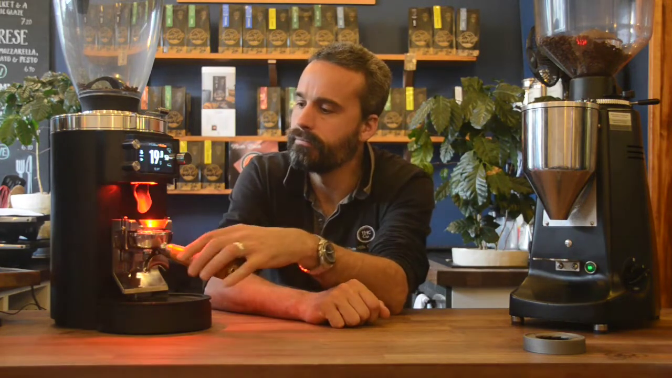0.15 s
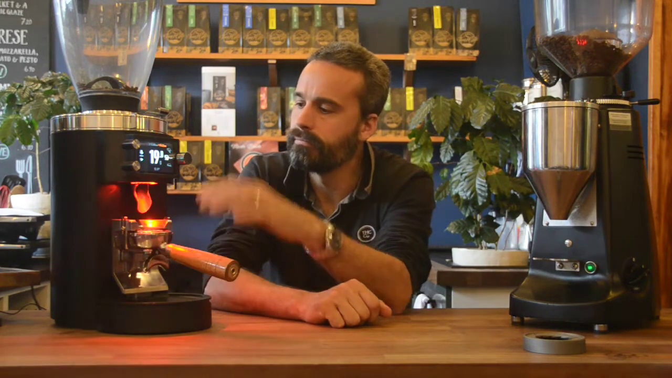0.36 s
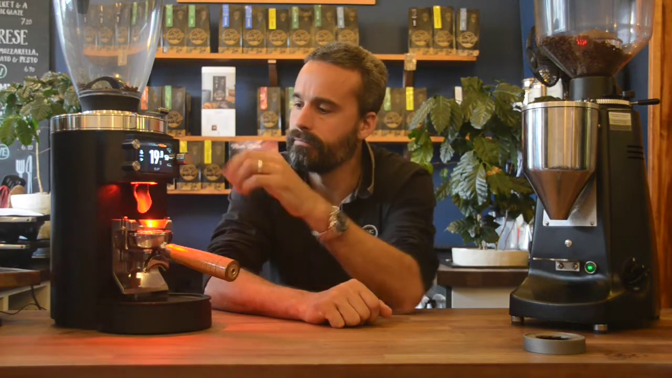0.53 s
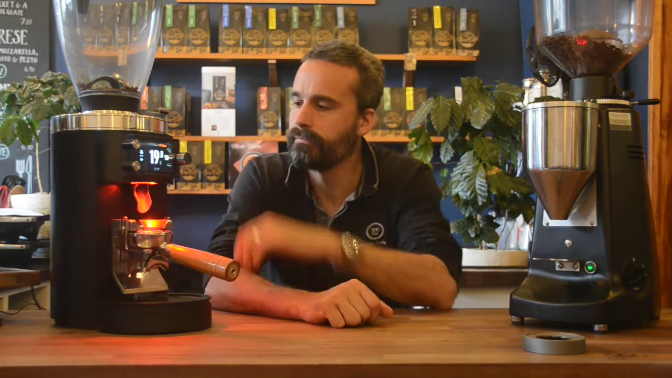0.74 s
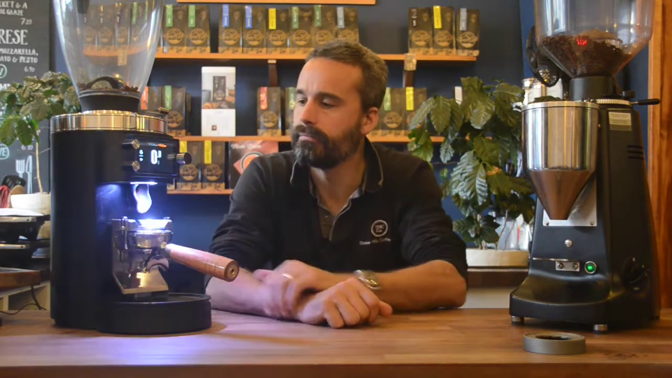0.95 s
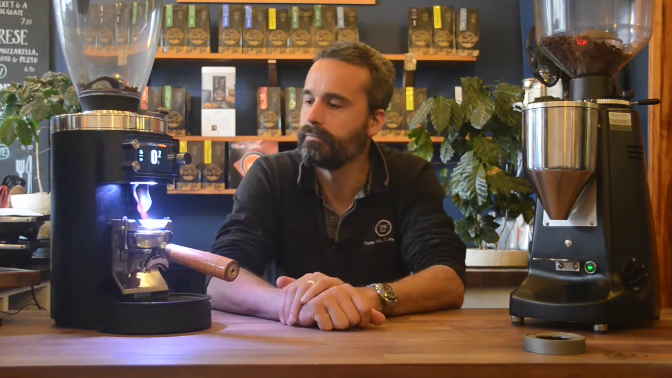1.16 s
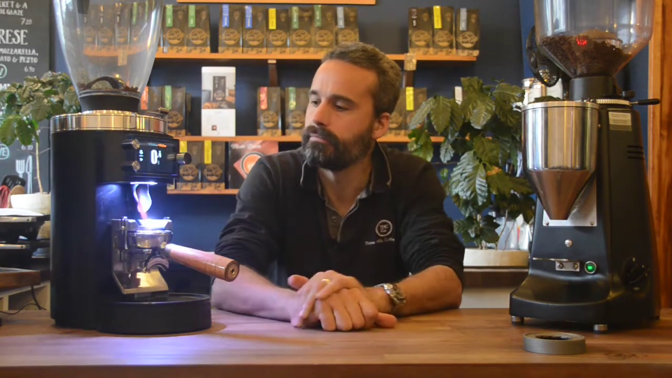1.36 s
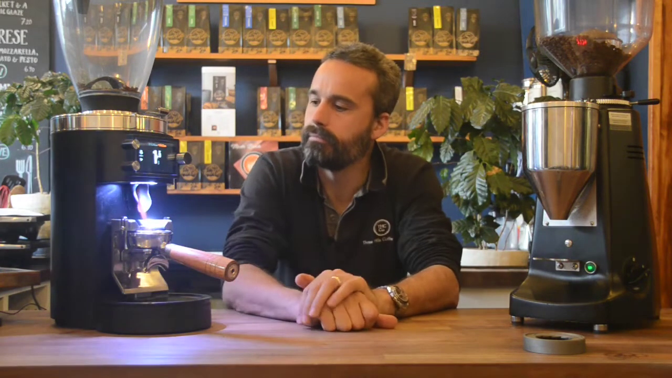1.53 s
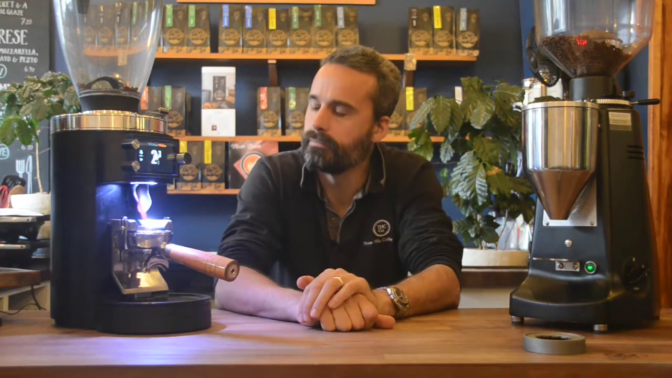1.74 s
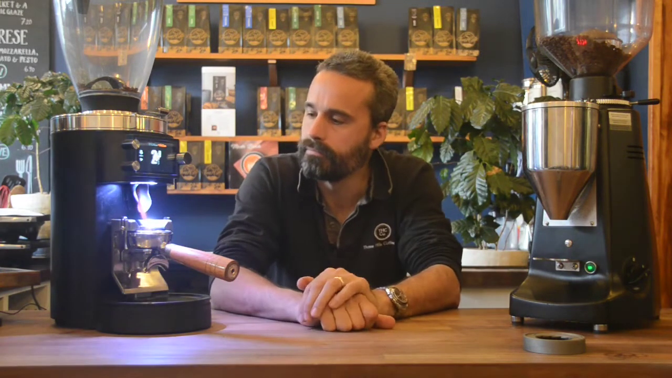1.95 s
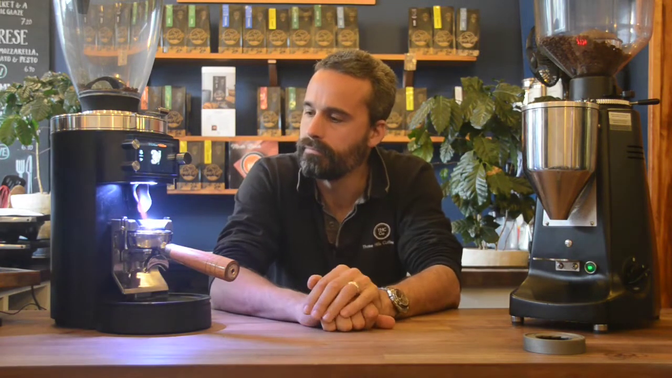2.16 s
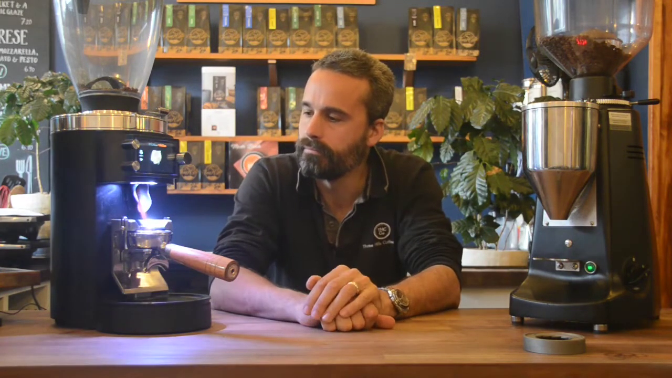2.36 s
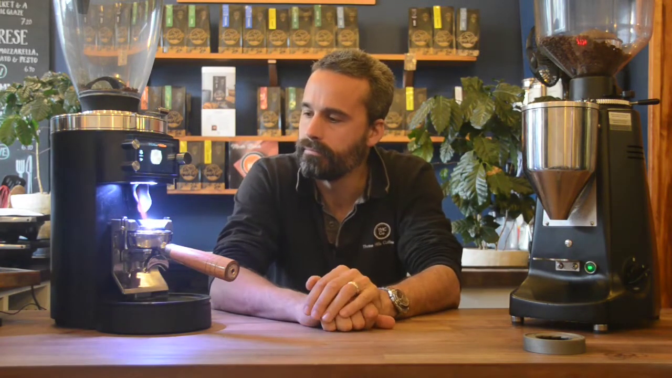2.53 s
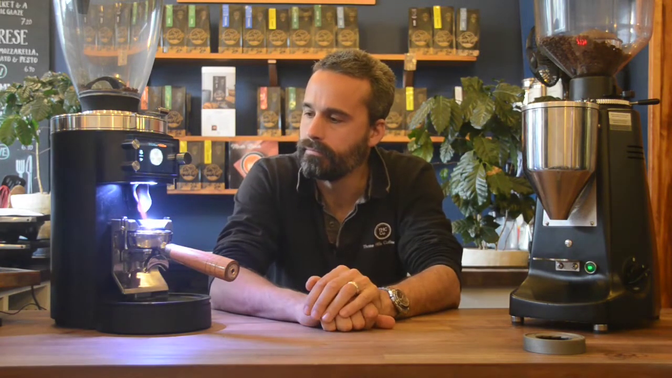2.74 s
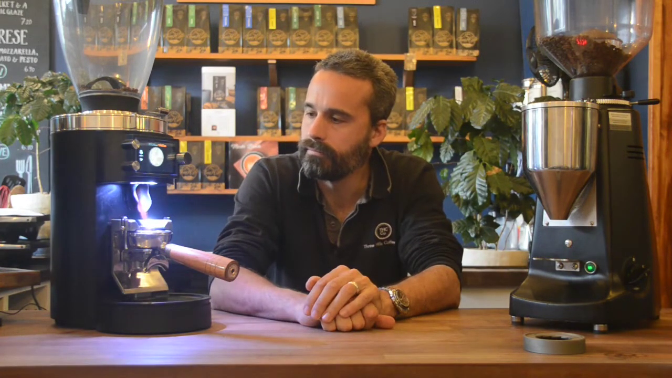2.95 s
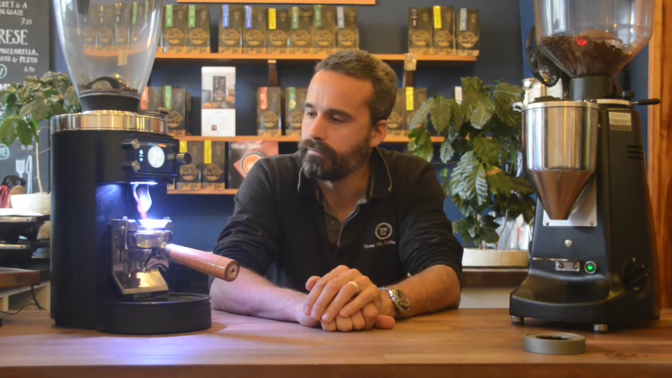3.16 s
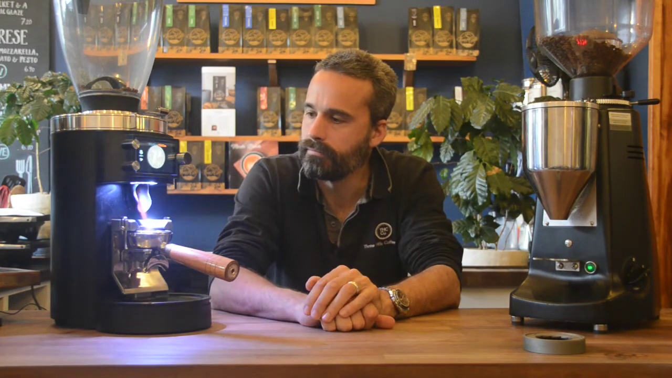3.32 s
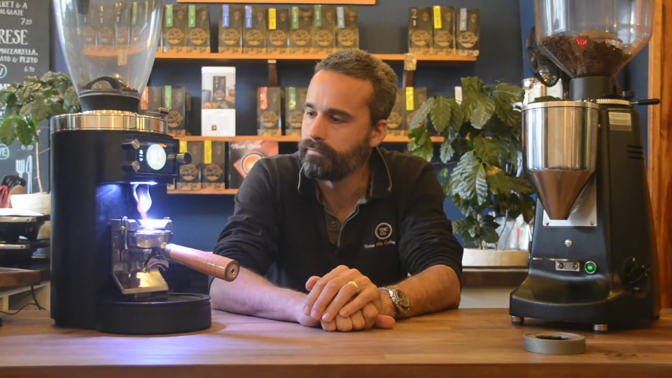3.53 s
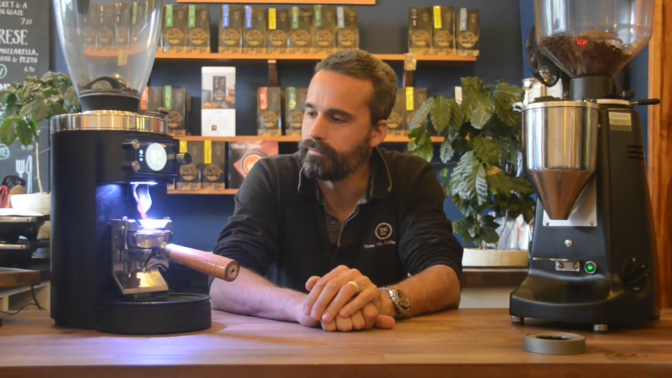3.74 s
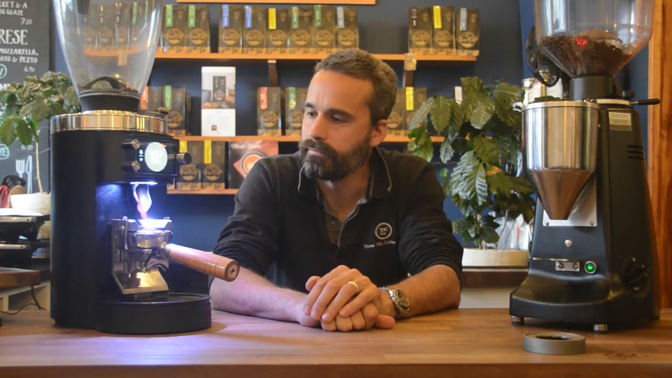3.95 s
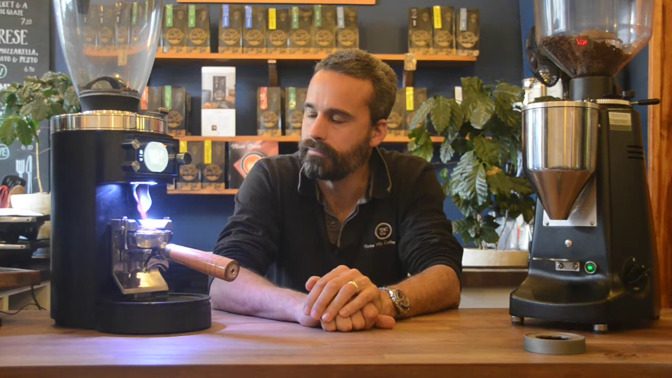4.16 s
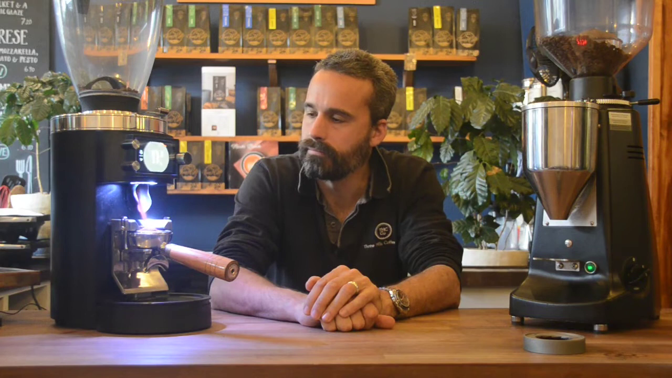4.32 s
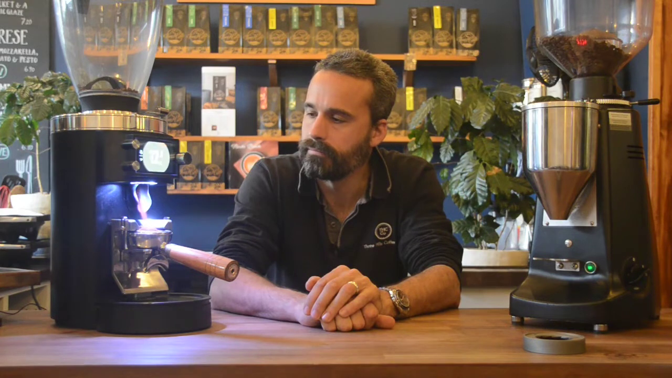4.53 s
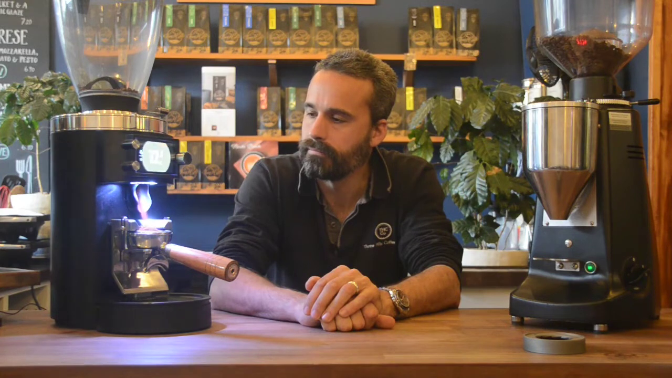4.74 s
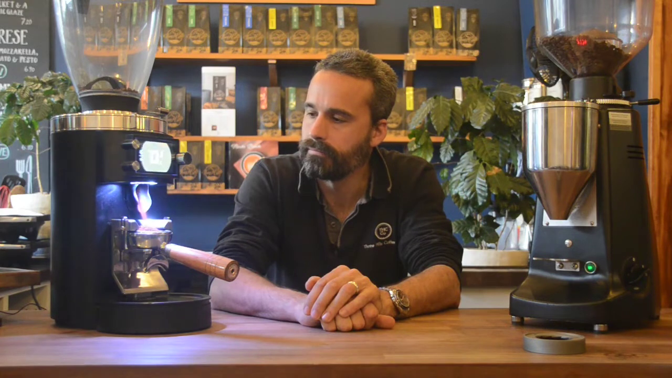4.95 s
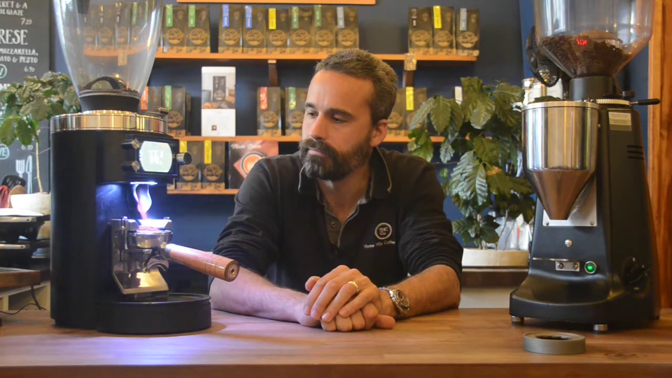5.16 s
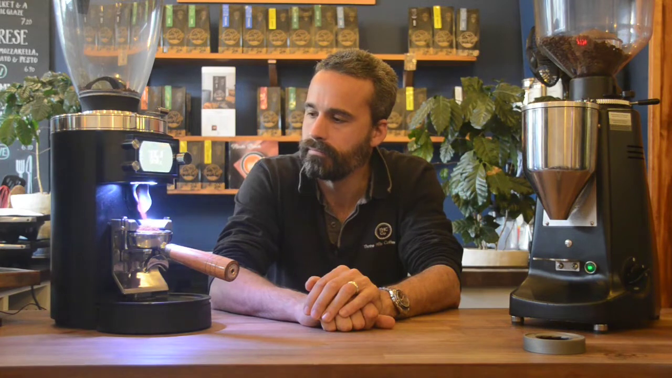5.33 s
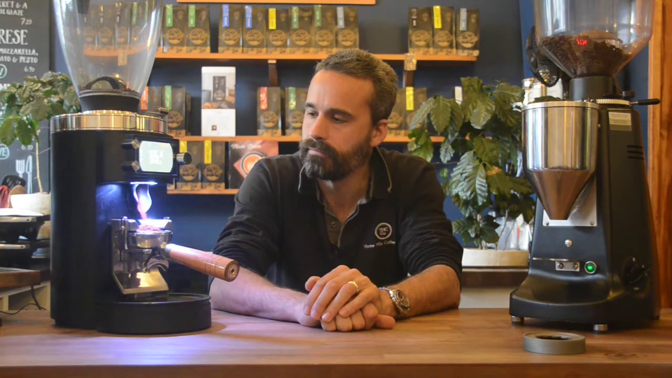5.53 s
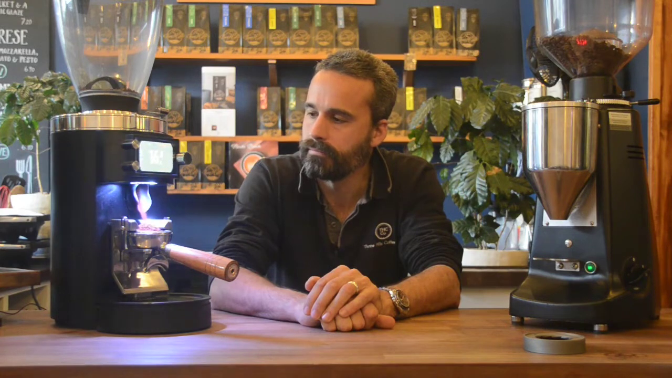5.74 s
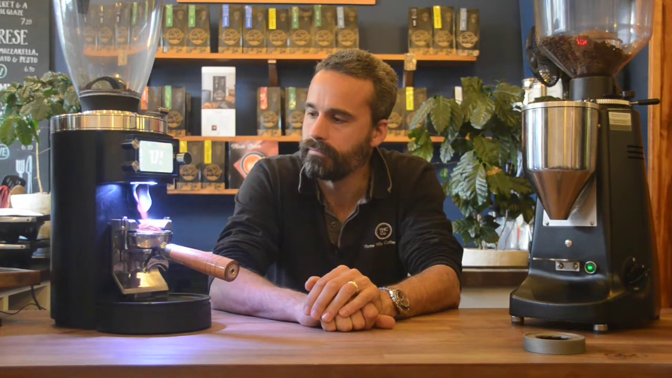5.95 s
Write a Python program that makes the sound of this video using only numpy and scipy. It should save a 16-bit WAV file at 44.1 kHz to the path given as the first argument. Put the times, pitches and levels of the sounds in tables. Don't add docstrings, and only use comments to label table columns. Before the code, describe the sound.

From 0 to 0.4 s a quiet shop is heard: low airy ventilation and distant refrigerator hum, with a compressor and pipe tone swelling unevenly. At about 0.43 s a small switch ticks, followed until 0.83 s by a soft, hissy sleeve rub that swells twice, slightly hollow from the counter's reflection. At 0.84 s the motor starts with a hard knock, and a brief falling low thump follows at 0.9 s. Grinding comes in almost at once: a dense, loud, gritty roar of fracturing beans, metallic in the low mids, rattling and bright above, over a faint steady electrical hum. The brightest edge shifts slightly between 1 and 1.6 s. Whole beans snap sharply at 0.9, 1.0 and 1.5 s, more softly at 1.8, 3.0, 3.4, 3.9 and 5.4 s. The pitch stays constant, the level flutters, and grinding continues through the end at about 6 s. Close small microphone, short room reverberation.

```python
import sys
import numpy as np
from scipy import signal
from scipy.fft import rfft, irfft, next_fast_len
from scipy.io import wavfile
from scipy.ndimage import map_coordinates

SR = 44100
rng = np.random.default_rng(int(sys.argv[2]) if len(sys.argv) > 2 else 0)


def wav_out(sig):
    wavfile.write(sys.argv[1], SR, np.round(np.clip(np.atleast_2d(sig).T, -1, 1) * 32767).astype(np.int16))


def boost_factor(decibels):
    exponent = np.asarray(decibels, float) / 20
    return 10 ** exponent


N = 268569
T = np.arange(N) / SR


def unit(x):
    return x / np.sqrt(np.mean(x ** 2) + 1e-20)


def along(points, hz):
    f, v = np.transpose(points)
    return np.interp(np.log(hz + 1), np.log(f + 1), v)


def curves(rows):
    s, *columns = np.transpose(rows)
    return [np.interp(T, s, column) for column in columns]


def wobble(rate):
    knots = rng.standard_normal(int(N * rate / SR) + 4)
    return map_coordinates(knots, [T * rate])


def coloured(x, gain):
    m = 2 * next_fast_len(N // 2 + SR // 4)
    cepstrum = irfft(np.log(gain(np.fft.rfftfreq(m, 1 / SR)) + 1e-5), m)
    cepstrum[1:m // 2] *= 2
    cepstrum[m // 2 + 1:] = 0
    return irfft(rfft(x, m) * np.exp(rfft(cepstrum)), m)[..., :N]


def noise(spectrum):
    return unit(coloured(rng.standard_normal(N), lambda f: boost_factor(along(spectrum, f))))


def modes(rows, skirt):
    def peak(f, centre, width):
        return (f * width) ** 2 / ((centre * centre - f * f) ** 2 + (f * width) ** 2)

    def gain(f):
        return np.sqrt(sum(boost_factor(db) ** 2 * peak(f, hz, width) ** skirt for hz, width, db in rows))
    return gain


def tones(rows, sway_db, drift):
    total = 0
    for hz, db in rows:
        level = boost_factor(db + sway_db * wobble(6)) * np.sqrt(2)
        total = total + level * np.sin(2 * np.pi * hz * T + drift * wobble(5.5))
    return total


def blows(rows):
    x = np.zeros(N)
    for s, db in rows:
        x[round(s * SR)] = boost_factor(db)
    return x


def shop():
    # time_s, drone_db, compressor_db, pipe_db
    swells = [(0.0, -47, -58, -58), (0.162, -45.5, -57.5, -58), (0.328, -46, -51, -53),
              (0.524, -50, -49, -39), (0.55, -43, -52, -61), (0.59, -51, -53, -59), (0.63, -40, -58, -55),
              (0.656, -53, -52, -39), (0.68, -38, -57, -47.5), (0.724, -49, -53, -63),
              (0.784, -50, -49, -66), (0.82, -51, -52, -37)]
    # frequency_hz, level_db (per Hz)
    air_spectrum = [(12, -69), (20, -23), (171, -18), (219, -10), (238, -14), (306, -14), (362, -10),
                    (520, -19), (1380, -31), (1630, -34), (1980, -38), (2150, -35), (2340, -39.5),
                    (15500, -66)]
    # frequency_hz, width_hz, level_db
    shell = [(422.7, 11.3, 2.5), (588, 32, -6), (647, 21, -9), (720, 31, -6.5), (792, 18, -4.5)]
    # pitch_hz, level_db (rms)
    fridge = [(213.8, -48.5), (257, -47), (300, -53), (1593, -66), (2126, -68)]
    drone_db, compressor_db, pipe_db = curves(swells)
    air = boost_factor(drone_db + 2) * noise(air_spectrum)
    shell_noise = unit(coloured(rng.standard_normal(N), modes(shell, skirt=0.99)))
    pump = boost_factor(compressor_db + 8.5) * shell_noise
    pipe = boost_factor(pipe_db) * tones([(496, -0.79)], sway_db=1.0, drift=1.4)
    return air + pump + pipe + tones(fridge, sway_db=2.5, drift=0.45)


def hand():
    # time_s, peak_db
    contact = [
        (0.4324, -32),
    ]
    # time_s, level_db
    sleeve = [
        (0.45, -77),
        (0.488, -60),
        (0.514, -52),
        (0.586, -48),
        (0.616, -56),
        (0.678, -51),
        (0.756, -55),
        (0.836, -64),
    ]
    # time_s, delay_ms
    bounce = [
        (.45, 0.52),
        (.6, 0.76),
        (.61, 0.52),
        (.86, 0.766),
    ]
    # frequency_hz, level_db (per Hz)
    cloth = [(1760, -31), (3000, -7), (3420, -11), (5610, -11), (6530, -6), (13000, -4), (15500, -11)]
    tick = boost_factor(15) * coloured(blows(contact), modes([(2300, 780, 0), (4300, 890, -2)], skirt=1.5))
    rub = noise(cloth)
    delay_ms = curves(bounce)[0]
    echo = map_coordinates(rub, [np.arange(N) - delay_ms * SR / 1000])
    moving = (T > sleeve[0][0]) & (T < sleeve[-1][0])
    return tick + moving * boost_factor(curves(sleeve)[0]) * unit(rub + 0.42 * echo)


def kick():
    # time_s, peak_db
    jerks = [
        (.8405, -23),
        (.8455, -6),
        (.851, -16),
    ]
    # frequency_hz, width_hz, level_db
    frame = [(253, 40, -4), (355, 40, 1), (517, 45, 4), (696, 45, -4), (900, 45, -1), (1300, 70, -11),
             (3600, 1800, -39)]
    # start_s, from_hz, to_hz, level_db
    lurch = (.895, 109, 51, -30)
    start_s, from_hz, to_hz, level_db = lurch
    progress = np.clip((T - start_s) / 0.049, 0, 1)
    phase = 2 * np.pi * np.cumsum(from_hz + (to_hz - from_hz) * progress) / SR
    thump = boost_factor(level_db) * np.sin(np.pi * progress) * np.sin(phase)
    return boost_factor(34) * coloured(blows(jerks), modes(frame, skirt=1.2)) + thump


def hail(per_s, spread_db, grit):
    draw = rng.random((20000, 3))
    gaps_s = -np.log(draw[:, 0] + 1e-9) / per_s
    when = np.cumsum(gaps_s * SR).astype(int)
    size = boost_factor(-spread_db * np.log(draw[:, 1] + 0.0016)) * np.sign(draw[:, 2] - .5)
    fractures = np.bincount(when, size, N)[:N]
    return unit(unit(fractures) + grit * rng.standard_normal(N))


def grinder():
    # time_s, casing_db, hopper_db, chute_db, dust_db
    grind = [(0.86, -17, -29, -29, -43), (0.89, -18, -15.5, -25, -39), (0.92, -24.5, -22.5, -26.5, -38),
             (0.96, -11, -19, -25.5, -46), (1.0, -19.5, -18.5, -25, -38), (1.03, -12.5, -17, -25, -42),
             (1.06, -19, -24, -27, -41), (1.09, -26, -16.5, -25.5, -41), (1.12, -17.5, -18.5, -25, -44),
             (1.22, -17.5, -19, -26.5, -40), (1.3, -15, -19.5, -27.5, -40.5), (1.49, -20, -21.5, -25, -40),
             (1.63, -12, -21, -25, -40), (1.66, -17, -20, -26.5, -39.5), (2.15, -16, -20.5, -26.5, -40),
             (2.17, -20, -21.5, -24.5, -40), (2.2, -11, -16.5, -28, -40), (2.23, -21.5, -19.5, -26.5, -41),
             (2.3, -15.5, -19, -25.5, -39), (2.53, -16, -21, -25.5, -40), (2.58, -21, -20, -26.5, -40),
             (2.65, -12.5, -18, -26, -40), (2.74, -21.5, -19, -24.5, -41), (2.77, -14.5, -19.5, -26, -39),
             (2.81, -24.5, -21, -26.5, -40), (2.86, -10.5, -20, -26, -39), (2.87, -18, -22.5, -25.5, -39),
             (2.93, -14, -15.5, -27.5, -40), (2.94, -15.5, -19.5, -26, -42), (3.63, -17.5, -19.5, -26, -39),
             (3.85, -13.5, -18.5, -25, -39.5), (3.86, -16.5, -20, -25, -38), (4.02, -14, -17, -27, -41),
             (4.06, -18, -20.5, -27.5, -41), (4.27, -18.5, -20, -27, -41), (4.28, -14.5, -21.5, -27.5, -41),
             (4.47, -20.5, -18.5, -26.5, -39.5), (4.5, -12.5, -19, -26, -40), (4.69, -19, -19.5, -27, -40),
             (4.78, -15.5, -17.5, -25, -41), (4.79, -22.5, -21.5, -26.5, -39),
             (4.84, -15.5, -18, -25.5, -40), (5.03, -18, -20.5, -27.5, -40), (5.04, -19.5, -17, -26, -39),
             (5.08, -22.5, -17.5, -27, -41), (5.17, -14, -20.5, -25.5, -39), (5.22, -17.5, -18, -26, -40.5),
             (5.9, -16, -18.5, -26.5, -40), (5.94, -20.5, -24.5, -28, -40), (6.0, -14, -15.5, -27, -42),
             (6.09, -16, -20.5, -26, -40)]
    # frequency_hz, width_hz, level_db
    casing = [(254.7, 32.6, -12), (291, 32, -22.5), (541.7, 28.3, 1.5), (573, 48, -8), (674, 45, -11)]
    # frequency_hz, width_hz, level_db
    hopper = [(999, 49, -14), (1101.5, 74, -8), (1152, 26, -6.5), (1206, 56.6, -4.5), (1389, 29, -9.5),
              (1576, 99, -3), (1642, 53, -3), (1681, 39.5, -0.5)]
    # frequency_hz, width_hz, level_db
    chute = [(2120, 65, -10.5), (2486, 267, 3), (2860, 250, -2.5), (3130, 300, -3), (3987, 370, -8),
             (4414, 150, -7.5), (5170, 360, -13), (6230, 257, 0), (6440, 195, 1)]
    # frequency_hz, width_hz, level_db
    dust_lined = [(7990, 456, 6), (8970, 290, 2), (9600, 420, -1.5), (10600, 700, -8), (11870, 410, -3),
                  (12900, 450, -7.5), (13600, 470, -7.5), (15400, 400, -31)]
    # frequency_hz, width_hz, level_db
    dust_empty = [(7300, 400, 2), (7900, 360, 3.5), (9300, 410, -2.5), (9800, 440, -4), (11000, 700, -8),
                  (12500, 550, -7), (13600, 770, -10), (15400, 400, -20)]
    # from_s, to_s
    filling = (1.04, 1.6)
    # frequency_hz, level_db (per Hz)
    rumble = [(20, -36), (35, 7), (45, 1), (70, -8.5), (150, 11), (220, 6), (400, -13.5), (900, -6),
              (1400, 11.5), (2500, -32)]
    # pitch_hz, level_db (rms)
    hum = [(91.7, -58), (100, -40.5), (183.4, -50.5), (200, -59), (300, -42), (1200, -52)]
    start_s = .85
    running = np.clip((T - start_s) / 0.017, 0, 1)
    spun_up = np.clip((T - start_s) / 0.09, 0, 1)
    feed = boost_factor(0.54 * wobble(25) + 0.71 * wobble(90))
    beans = feed * hail(per_s=1500, spread_db=2.5, grit=1.27)

    def ring(rows, skirt):
        return unit(coloured(beans, modes(rows, skirt)))
    lined = np.interp(T, filling, [0, 1])
    dust = lined * ring(dust_lined, skirt=1.22) + (1 - lined) * ring(dust_empty, skirt=1.3)
    parts = [ring(casing, skirt=1.28), ring(hopper, skirt=1.28), ring(chute, skirt=1.276), dust]
    body = sum(part * boost_factor(db) for part, db in zip(parts, curves(grind)))
    shake = boost_factor(-38) * unit(coloured(beans, lambda f: boost_factor(along(rumble, f))))
    return running * (body + shake) + spun_up * tones(hum, sway_db=0.9, drift=0.13)


def cracks():
    # time_s, peak_db, brightness_db
    snaps = [
        (0.9044, -12, -19),
        (1.0061, -6, -23),
        (1.5189, -8, -24),
        (1.8347, -16, -19),
        (3.0026, -14, -20),
        (3.4476, -14, -22),
        (3.9175, -16, -21),
        (4.2857, -27, -20),
        (5.3911, -19, -21),
    ]
    low = blows([(s, db + 12) for s, db, _ in snaps])
    high = blows([(s, db + bright_db + 9) for s, db, bright_db in snaps])
    tick = coloured(low, modes([(3600, 680, 1), (4600, 600, -1)], skirt=1.3))
    edge = coloured(high, modes([(9000, 1800, 0)], skirt=1.4))
    return tick + edge


def room(x):
    # frequency_hz, t60_s
    walls = [(100, 0.52), (1000, 0.56), (12000, 0.26)]
    hz, t, z = signal.stft(rng.standard_normal(SR // 2), SR, nperseg=256)
    decay = boost_factor(-60 * t / along(walls, hz)[:, None])
    tail = signal.istft(z * decay, SR, nperseg=256)[1]
    late = np.pad(x, (300, 0))
    return signal.fftconvolve(late, tail / np.linalg.norm(tail))[:N]


def scene():
    near = hand() + kick() + grinder() + cracks()
    return (near + boost_factor(-11.5) * room(near) + shop())[None]


def roll_off(x):
    return signal.sosfilt(signal.butter(12, 15680, fs=SR, output="sos"), x)


def record(dry):
    # frequency_hz, width_hz, level_db
    notches = [(5710, 360, -11.5), (6960, 130, -17), (8650, 370, -2), (12400, 330, -1), (13480, 140, -5),
               (15200, 170, -18)]

    def housing(f):
        return boost_factor(sum(db / (1 + (2 * (f - hz) / width) ** 2) for hz, width, db in notches))
    x = coloured(dry, housing)
    x = x / (1 + np.abs(x / .88) ** 8) ** (1 / 8)
    return roll_off(x)


dry = scene()
out = record(dry)
wav_out(out)
```